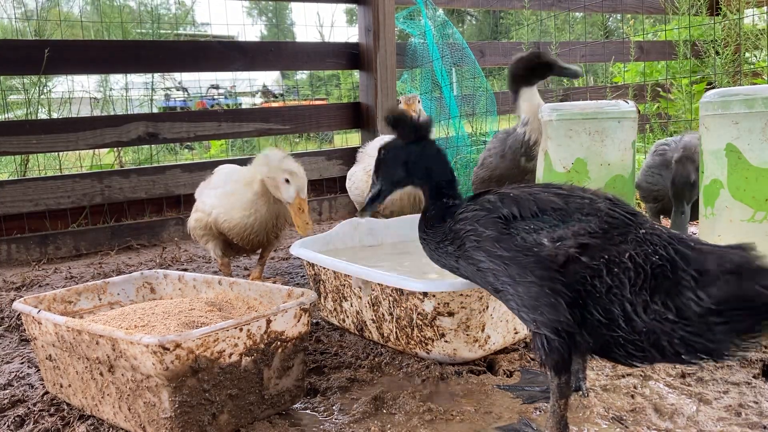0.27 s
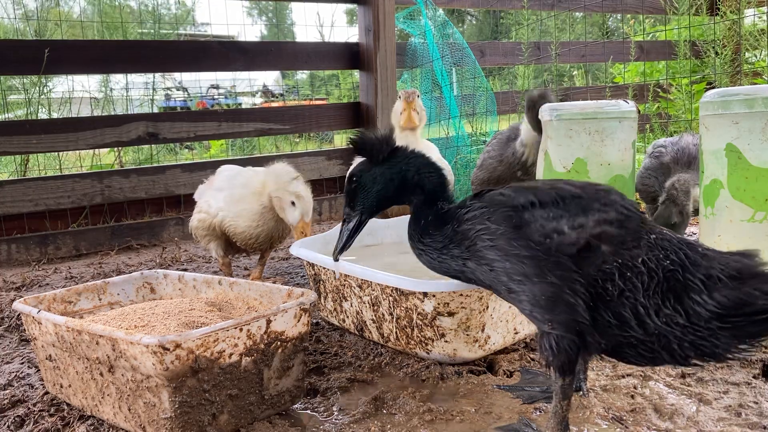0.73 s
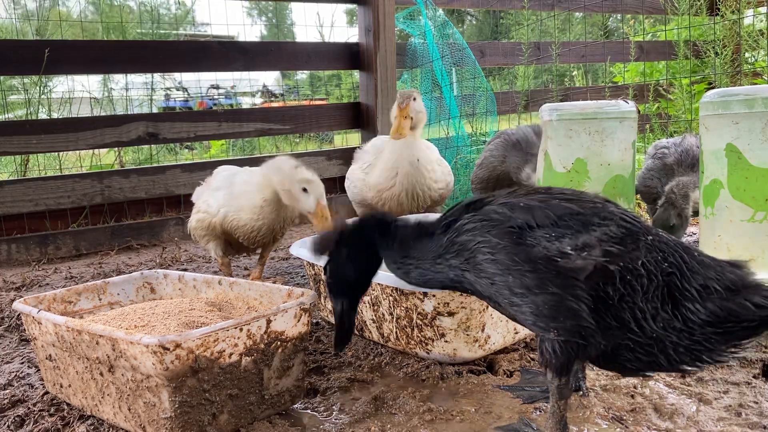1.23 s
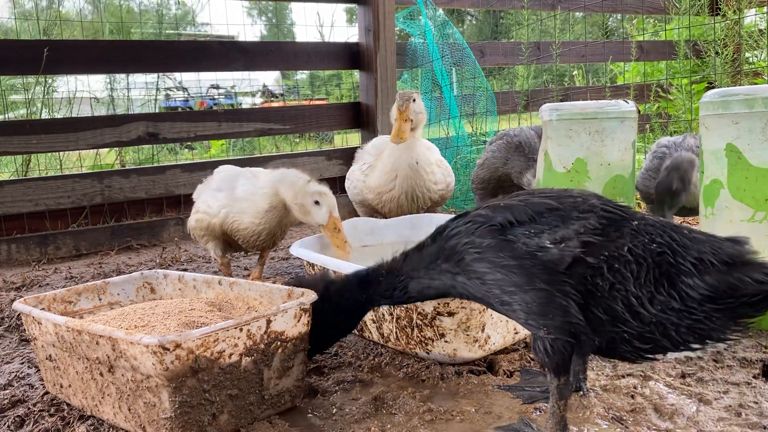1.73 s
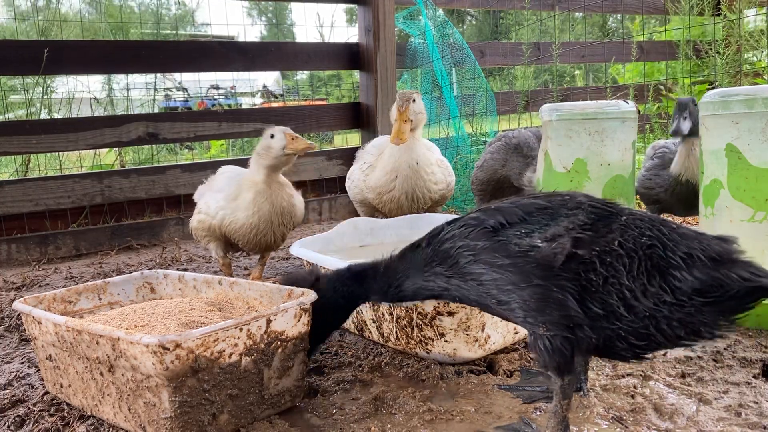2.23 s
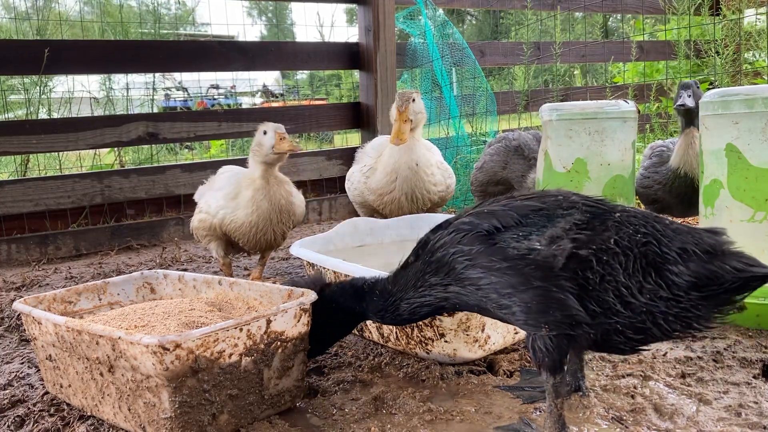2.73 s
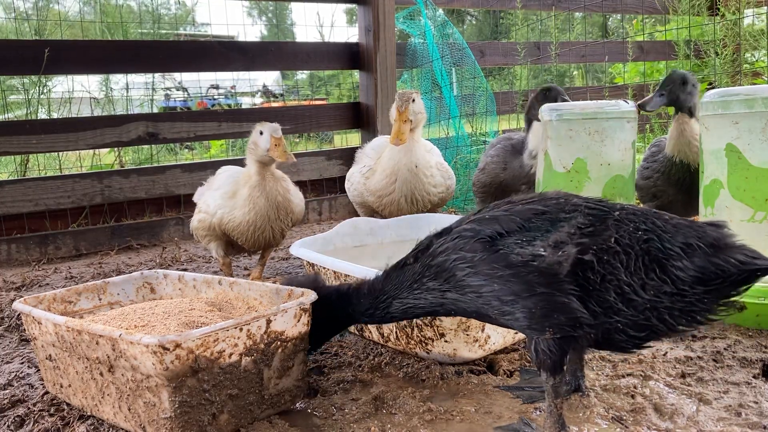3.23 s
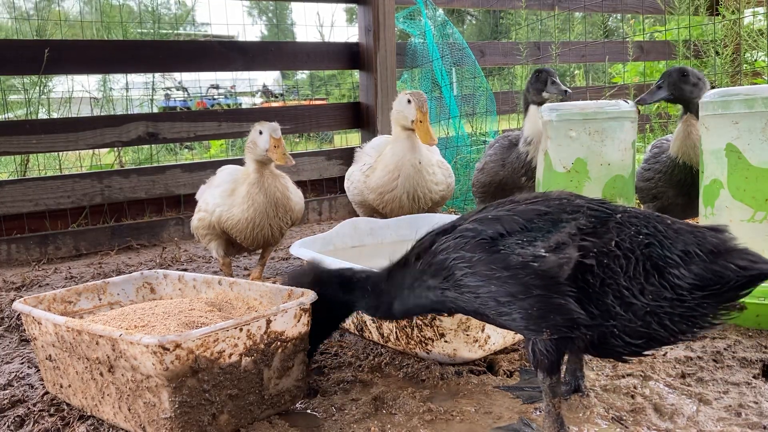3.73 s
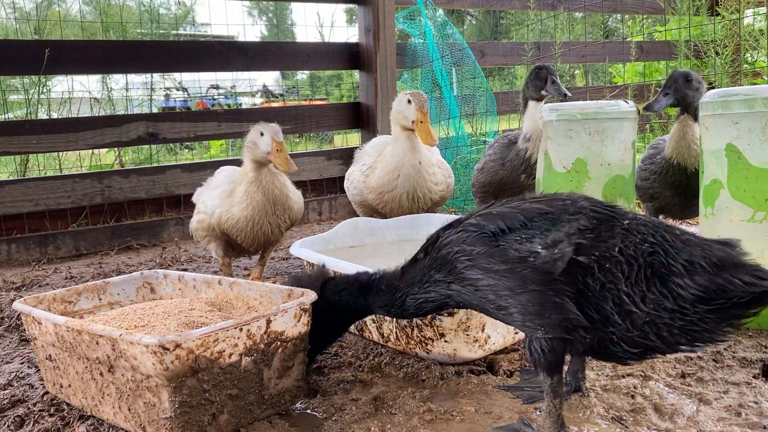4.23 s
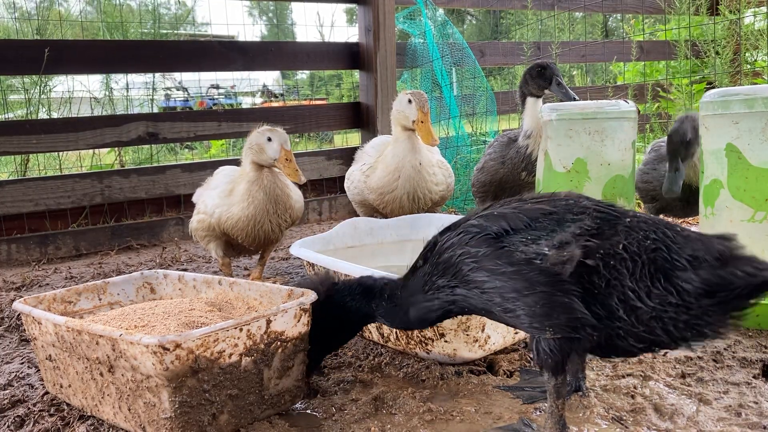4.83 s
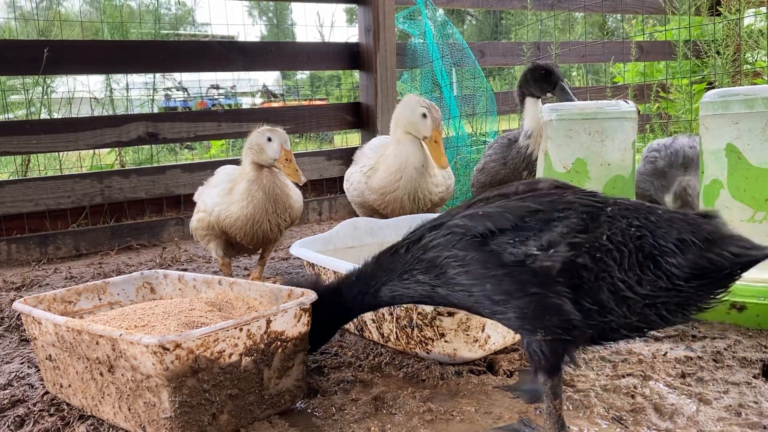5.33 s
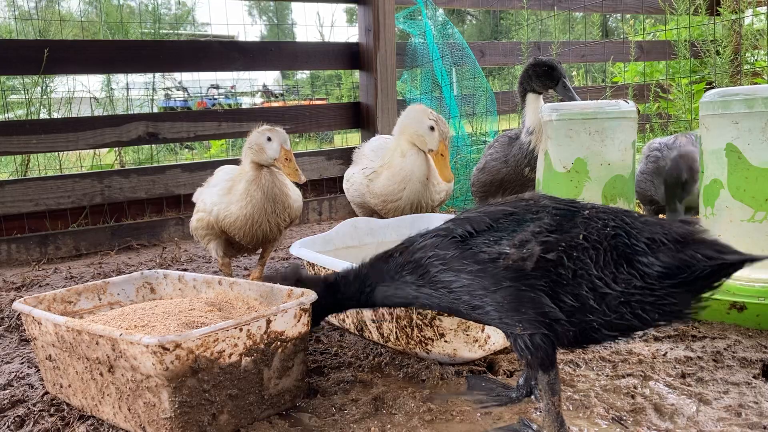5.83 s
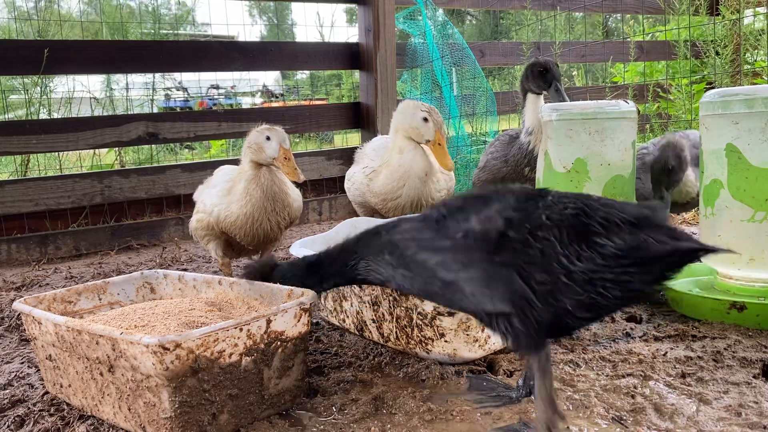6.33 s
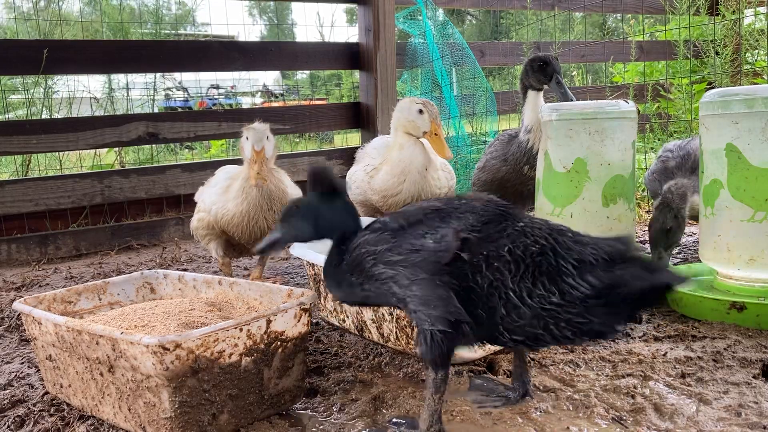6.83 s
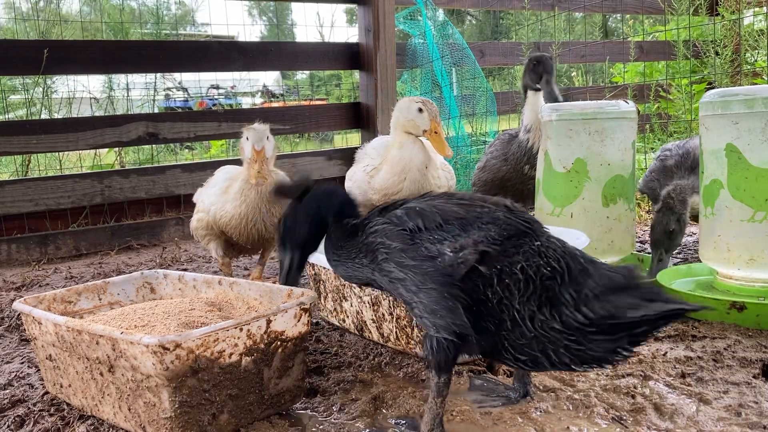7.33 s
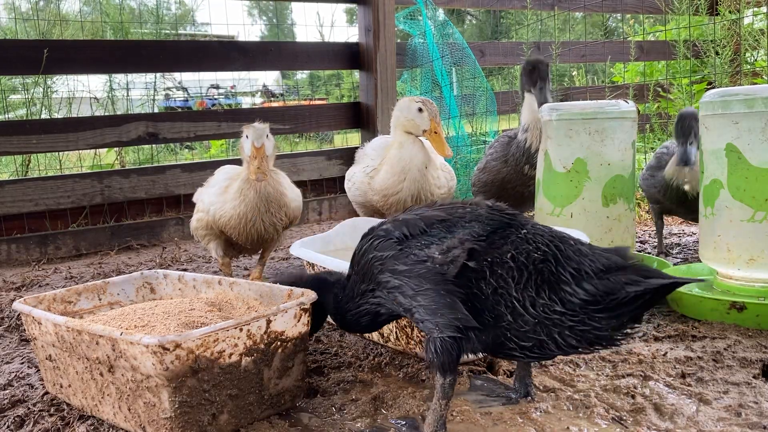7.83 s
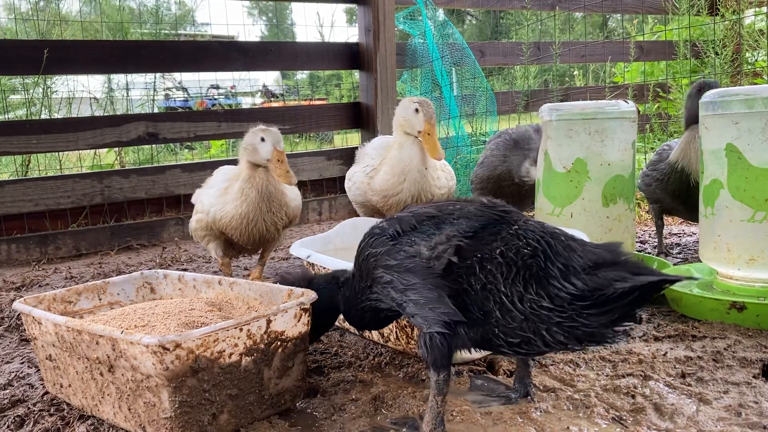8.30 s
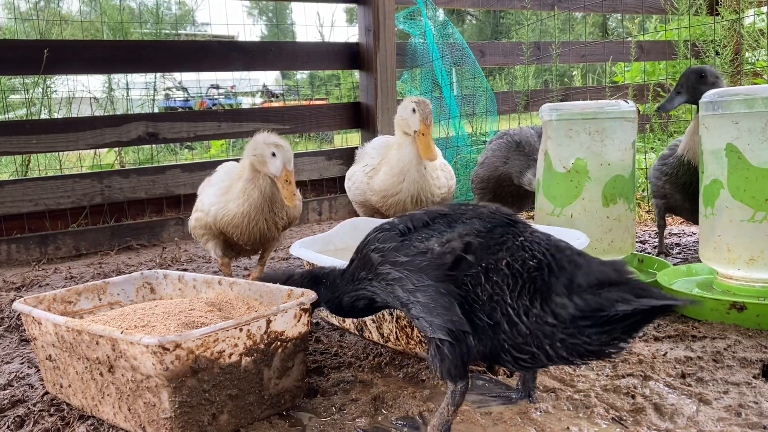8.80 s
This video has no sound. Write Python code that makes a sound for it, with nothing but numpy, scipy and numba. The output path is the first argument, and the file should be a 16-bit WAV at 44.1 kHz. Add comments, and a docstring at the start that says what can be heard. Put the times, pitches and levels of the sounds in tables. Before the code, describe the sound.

Close wet bill clicking and nibbling at a feed tub, drips and dull thuds, a brief quack midway, faint motor hum and insect buzz outdoors.

```python
"""Ducks in an outdoor pen, close to a phone on the ground. Bills clack and dabble in wet feed: noise bursts
ring through resonances. Damped tones make the knocks on tubs and the drips, bursts of droplets the splashes.
One short quack is a stack of harmonics, and a few peeps are nearly pure tones. Behind them two motors and the
mains hum and beat against each other (steady sines), an insect buzzes high up (pulsed noise) and the breeze
rustles in a background hiss (soft noise)."""
import sys
import numpy as np
from scipy import signal
from scipy.fft import rfft, irfft
from scipy.io import wavfile
from scipy.ndimage import uniform_filter1d
from numba import njit

SR = 44100
rng = np.random.default_rng(int(sys.argv[2]) if len(sys.argv) > 2 else 0)


def transcribe(signal):
    """Save signal, clipped to [-1, 1], as a 16-bit WAV file at the path in sys.argv[1]."""
    frames = np.atleast_2d(signal).T
    limited = np.clip(frames, -1, 1)
    pcm = np.round(limited * 32767).astype(np.int16)
    wavfile.write(sys.argv[1], SR, pcm)


N = 399546
T = np.arange(N) / SR  # time of each sample, s
HZ = np.arange(N // 2 + 1) * SR / N  # pitch of each spectrum bin


def undb(db):
    """Turn dB into a gain."""
    return 10 ** (np.asarray(db) / 20)


def unit(x):
    """Scale to an rms of 1."""
    return x / np.sqrt(np.mean(x ** 2))


def band(x, hz, width_hz):
    """Resonance with gain 1 at its centre."""
    width_hz = min(width_hz, SR / 5)
    return signal.lfilter(*signal.iirpeak(hz, hz / width_hz, SR), x)


@njit
def svf(x, hz, damp):
    """Resonance whose centre can move with time; gives its band-pass and high-pass outputs."""
    mid, high, b, l = np.empty(len(x)), np.empty(len(x)), 0., 0.
    for i in range(len(x)):
        g = np.tan(np.pi * hz[i] / SR)
        v = (b + g * (x[i] - l)) / (1 + g * (g + damp))
        mid[i] = damp * v
        high[i] = x[i] - damp * v - l - g * v
        b, l = 2 * v - b, l + 2 * g * v
    return mid, high


def add(track, s, x):
    """Mix a short sound into the track at s seconds."""
    i = int(s * SR)
    track[i:i + len(x)] += x[:N - i]


def fade(t60_s, rise_s):
    """Quick rise, then an exponential fall that loses 60 dB in t60_s."""
    t = np.arange(int(t60_s * SR) + 8) / SR
    return (1 - np.exp(-t / rise_s)) * 1000 ** (-t / t60_s)


def walk(rate):
    """Slow random wandering: about rate new levels a second, smoothed twice; spread near 1."""
    hold = int(SR / rate)
    steps = np.repeat(rng.standard_normal(N // hold + 1), hold)
    smooth = uniform_filter1d(uniform_filter1d(steps, hold), hold)
    return 1.25 * smooth[:N]


# change in the level of the low hum with time: start_s, change_db
HUM_CHANGE = [(0, 2), (2, 2), (4, -1.5), (7, -1.5), (8, -0.6), (9.06, -0.5)]


def hum_change():
    """The level of the low hum sinks, then recovers a little."""
    s, db = np.transpose(HUM_CHANGE)
    return np.interp(T, s, db)


# base rate of each hum, two motors and then the mains: rate_hz
HUM_RATES = [59.02, 55.0, 60.0]
# one row a hum, before the hum change: level_db (rms) of 1, 2, 3, 4 and 5 times its base rate
HUM_LEVELS = [(-41.5, -55, -57, -51, -66), (-47, -66, -54, -64, -75), (-70, -56, -70, -59.5, -75)]


def hums(hum_db):
    """Steady multiples of each base rate; the higher ones waver more, and near rates beat."""
    out = 0
    for hz, levels_db in zip(HUM_RATES, HUM_LEVELS):
        for k, db in enumerate(levels_db, 1):
            gain = np.sqrt(2) * undb(db + 0.52 * k * walk(3.27))
            out = out + gain * np.sin(2 * np.pi * (k * hz * T + rng.random()))
    return out * undb(hum_db)


# colour of the background hiss before its swells: pitch_hz, level_db (for each Hz of width)
HISS_COLOUR = [(28, -79), (45, -60), (60, -62.5), (110, -65), (250, -70), (500, -81.5), (1000, -88),
               (2000, -95.5), (4000, -100), (5500, -103), (7000, -102), (9000, -108), (11500, -104),
               (13500, -114), (15000, -108), (16000, -112)]


def breeze(gust_db, rumble_db):
    """Background hiss in overlapping octave parts that swell with the gust and flicker on their own."""
    hz, db = np.transpose(HISS_COLOUR)
    colour_db = np.interp(np.log(HZ + 1), np.log(hz), db, left=-120)
    colour = rfft(rng.standard_normal(N)) * undb(colour_db) * np.sqrt(SR / 2)
    octave = np.log2((HZ + 1) / 30)
    out = np.zeros(N)
    for k in range(11):
        part = irfft(colour * np.clip(1 - abs(octave - k), 0, 1), N)
        swell_db = gust_db + 1.6 * walk(7)
        if k < 5:  # only the low parts follow the rumble
            swell_db = swell_db + rumble_db
        out += part * undb(swell_db)
    return out


# the insect through time: start_s, level_db (rms), pitch_hz (middle of each stroke's climb)
INSECT_PATH = [(0, -57.5, 9620), (4.77, -57.5, 9620), (4.81, -66, 9450), (6.5, -66, 9450), (6.6, -60, 9480),
               (7.8, -59.5, 9520), (8.3, -58.5, 9620), (9.06, -58, 9620)]
STROKE_RATE_HZ = 64.2


def insect():
    """Wing strokes pulse a narrow high rasp that climbs during each stroke, with a fainter skirt below."""
    s, db, hz = np.transpose(INSECT_PATH)
    stroke = (STROKE_RATE_HZ * T + 0.13 * walk(6.3)) % 1  # 0-1 through each stroke
    hz = np.interp(T, s, hz) * (1 + 0.049 * (stroke - .5))
    noise = rng.standard_normal(N)
    rasp = svf(svf(noise, hz, 0.045)[0], hz, 0.07)[0]
    skirt = undb(-12) * band(band(noise, 9190, 1200), 9380, 1800)
    pulse = .35 + np.sin(np.pi * stroke)
    return unit((rasp + skirt) * pulse) * undb(np.interp(T, s, db))


KNOCK_CYCLES = 15  # a knock loses 60 dB in this many cycles, within these limits:
KNOCK_SHORTEST_S, KNOCK_LONGEST_S = .013, .067
SHORTEST_RISE_S, UPPER_MODE_DB = .0008, -15
DRIP_HZ = 3000  # from here up the glide scale and raggedness are full
DRIP_GLIDE = .25  # largest glide scale; the pitch climbs by up to twice this share
DRIP_ROUGH = .8  # share of noise, 0-1
# dull knocks on tubs and ground, plops and drips in the water: start_s, level_db (about the peak),
# pitch_hz (before any glide)
KNOCKS_AND_DRIPS = [(.052, -50, 5000), (.093, -38.5, 560), (.161, -45, 8000), (.171, -46, 4500),
                    (.219, -49, 2000), (.779, -46, 2600), (.968, -41.5, 794), (.993, -42, 5260),
                    (1.13, -44.5, 2760), (1.176, -50, 1500), (1.219, -47, 5000), (1.124, -42.5, 890),
                    (1.209, -38, 447), (1.288, -38.5, 490), (1.317, -49, 820), (1.381, -50, 4200),
                    (1.387, -47, 810), (1.436, -47, 7750), (1.481, -45, 850), (1.561, -48, 840),
                    (1.61, -41, 430), (1.764, -45, 1900), (1.766, -45, 3300), (1.959, -44, 6700),
                    (2.003, -37.5, 1820), (2.259, -43, 4270), (2.447, -41, 1850), (1.962, -28, 217),
                    (1.995, -29, 212), (2.064, -40, 169), (2.176, -30.5, 206), (2.25, -35, 200),
                    (2.37, -36.5, 184), (2.105, -45, 800), (2.213, -46, 1500), (2.643, -26, 92),
                    (2.705, -22, 116), (2.909, -40.5, 620), (3.146, -33, 403), (3.211, -44.5, 1780),
                    (3.233, -42, 1110), (3.272, -49, 1750), (3.274, -45, 950), (3.301, -47, 2380),
                    (3.31, -45, 800), (3.439, -48, 3020), (3.514, -28, 89), (3.543, -47, 3600),
                    (3.711, -41, 407), (4.278, -48, 1760), (4.586, -45, 3800), (4.932, -42.5, 4040),
                    (4.968, -52, 3000), (5.024, -47, 2020), (5.032, -41, 2650), (5.178, -49, 2500),
                    (5.285, -47, 7500), (5.384, -44, 2380), (5.526, -45, 2180), (5.6, -45, 1500),
                    (5.601, -47, 3520), (6.118, -48, 5100), (6.12, -53, 3100), (6.324, -38.5, 281),
                    (6.329, -39.5, 596), (6.459, -35.5, 173), (7.146, -45.5, 1750), (7.23, -44, 1050),
                    (7.252, -40.5, 422), (7.254, -42.5, 2880), (7.336, -47, 3540), (7.447, -22.5, 522),
                    (8.204, -42.5, 432), (8.204, -37.5, 790), (8.207, -42, 1020), (8.222, -52, 945),
                    (8.299, -39, 430), (8.3, -43, 1030), (8.41, -43, 516), (8.475, -39.5, 500),
                    (8.477, -48, 1440), (8.536, -47, 3920), (8.857, -44, 4000), (8.95, -36.5, 4930),
                    (9.021, -44, 5360)]


def knocks():
    """Damped tones with a quicker mode above; high drips glide up raggedly; faint plops lie between."""
    out = np.zeros(N)
    faint = []
    for when, size, pitch in rng.random((90, 3)):
        faint.append((when * N / SR, -54 + 8 * size, 300 * 3 ** pitch))
    for s, db, hz in KNOCKS_AND_DRIPS + faint:
        t60_s = np.clip(KNOCK_CYCLES / hz, KNOCK_SHORTEST_S, KNOCK_LONGEST_S)
        shape = fade(t60_s, max(1.07 / hz, SHORTEST_RISE_S))  # bigger bodies are pushed more slowly
        shape = shape / shape.max()
        small = min(hz / DRIP_HZ, 1)
        along = np.arange(len(shape)) / len(shape)
        glide = DRIP_GLIDE * small * rng.random() * (2 * along - .3)
        phase = 2 * np.pi * np.cumsum(hz * (1 + glide)) / SR
        rough = DRIP_ROUGH * small
        fizz = unit(band(rng.standard_normal(len(shape)), hz, .5 * hz))
        tone = np.sqrt(1 - rough ** 2) * np.sin(phase) + rough * fizz / 2
        upper = undb(UPPER_MODE_DB) * shape ** 3.2 * np.sin(2.05 * phase)
        add(out, s, undb(db) * (shape * tone + upper))
    return out


LEAD_S = .01  # room before the blow for the first touch
RING_WIDTH = .27  # as a share of the ring's pitch
WET_DB = -17.5  # strength of the wet smear's noise against the blow's


def clack(db, ring_hz, bright_db, tick_hz):
    """A bill shuts raggedly: first touch, blow, rebound, smear; its hollow rings and the wet film ticks."""
    burst, shape = np.zeros(2048), fade(.008, .0006)
    first_s, rebound_s, first, rebound = rng.random(4)
    add(burst, LEAD_S - .002 - 0.0053 * first_s, undb(-15 - 10 * first) * shape)
    add(burst, LEAD_S, shape)
    add(burst, LEAD_S + 0.0043 + 0.0143 * rebound_s, undb(-15 - 12 * rebound) * shape)
    add(burst, LEAD_S, undb(WET_DB) * fade(.05, .004)[:1600])
    ring_noise, tick_noise = burst * rng.standard_normal((2, 2048))

    ring = band(band(ring_noise, ring_hz, RING_WIDTH * ring_hz), ring_hz, 0.7 * ring_hz)
    ring += undb(-19) * band(band(ring_noise, 1690, 540), 2100, 1500)
    ring += undb(-26) * band(ring_noise, 2500, 4300)
    tick = band(band(tick_noise, tick_hz, 1700), tick_hz, 8000)
    tick += undb(-3.5) * band(np.diff(tick_noise, prepend=0), 9240, 2500)

    bright = min(undb(bright_db), .98)
    dull = np.sqrt(1 - bright ** 2)
    return undb(db) * (dull * ring / abs(ring).max() + bright * tick / abs(tick).max())


# bill clacks: start_s (the blow), level_db (about the peak), ring_hz, bright_db (share of wet tick), tick_hz
BILL_CLACKS = [(0.081, -40, 5690, -2.5, 10150), (0.1095, -40, 1350, -1, 9650),
               (0.199, -31.5, 4600, 0, 11800), (0.2293, -31, 1410, 0, 10300), (0.777, -44, 2000, -16, 9830),
               (0.995, -44, 1870, -18, 9810), (1.037, -43, 1780, -17, 9730),
               (1.129, -43.5, 1790, -23, 9780), (1.175, -39.5, 1520, -1.5, 11000),
               (1.5454, -32.5, 1780, -5, 7500), (1.547, -33.5, 3820, -20, 7500),
               (1.664, -34, 1930, -3.5, 6200), (1.75, -33, 1780, 0, 11000), (1.786, -37, 1950, -2, 9840),
               (1.8354, -31, 4140, -3.5, 7050), (1.881, -34.5, 1810, 1, 10400),
               (1.9433, -32.5, 1630, -11, 10600), (1.996, -31.5, 3700, -7.5, 10000),
               (2.0032, -27.5, 4000, -18, 10100), (2.0643, -38, 1310, 0, 10800),
               (2.082, -33, 3800, -2.5, 10900), (2.1477, -33.5, 4250, -5, 6400),
               (2.2, -30.5, 1600, 0, 7500), (2.26, -37, 1840, -9, 10000), (2.303, -38.5, 2020, -3, 9790),
               (2.325, -31, 4420, -6.5, 6600), (2.432, -44, 1810, -16, 9840),
               (2.446, -31.5, 3700, -25, 6560), (2.4918, -39, 1440, 0, 10200),
               (2.5058, -27, 3900, -2, 8660), (2.743, -31, 2240, -2, 9600), (2.7432, -39, 1590, -20, 9600),
               (3.1162, -35, 1440, 0, 10700), (3.21, -37, 1210, -25, 7540), (3.355, -38.5, 1460, 0, 6740),
               (3.3788, -36.5, 3930, -12, 6420), (3.4134, -38, 1410, 0, 7040),
               (3.4455, -34, 3960, -2.5, 7160), (3.4679, -39, 1770, 0, 7020), (3.524, -37, 1770, 0, 9800),
               (3.576, -39, 2390, 0, 10100), (3.592, -32, 3600, 0, 11000), (3.644, -37, 4000, -2, 11100),
               (3.6592, -18, 4100, -1, 7330), (3.6598, -23.5, 2390, -5.5, 6900),
               (3.782, -34.5, 4200, -14, 10500), (3.8416, -34, 1310, 0, 10400),
               (3.875, -34.5, 6470, -15, 6500), (3.987, -30, 1410, 0, 10200), (4.0496, -40, 1630, 0, 10100),
               (4.24, -39, 5690, -4, 6350), (4.31, -36.5, 1780, -0.5, 11500),
               (4.3112, -35.5, 3330, -1, 6700), (4.3498, -33.5, 4640, -3.5, 11200),
               (4.41, -37, 1770, 0, 10500), (4.529, -37, 3920, -5, 10400), (4.5851, -36, 1780, 0, 9450),
               (4.9037, -38.5, 1580, 1, 11200), (5.003, -34.5, 2340, -2.5, 7500),
               (5.0222, -39, 2960, -2, 7640), (5.1645, -42, 2560, -20, 9700), (5.2035, -35, 2330, 0, 10200),
               (5.2593, -40, 1790, 0, 12000), (5.4203, -29.5, 4140, 0, 11400),
               (5.505, -39.5, 2050, -21, 10300), (5.5832, -39.5, 2140, -3.5, 8230),
               (5.657, -39, 1590, 0, 10100), (5.679, -39.5, 2500, -3, 7600),
               (5.8144, -38.5, 1530, 0, 12200), (5.8316, -38, 2800, -21, 7770),
               (5.936, -42, 1350, 0, 10400), (6.1874, -35, 2600, -8, 11200),
               (6.1873, -33.5, 3250, -20, 11200), (6.188, -39, 4550, -20, 9000),
               (6.305, -38, 1920, 1, 11600), (6.4678, -36, 1900, -1, 10100),
               (6.523, -24.5, 5360, -4, 10300), (6.9007, -38.5, 4130, -9, 6440),
               (7.034, -40.5, 1940, -1.5, 6730), (7.177, -40, 1510, -23, 7810),
               (7.226, -44, 1700, -14, 9530), (7.251, -38, 1640, -26, 9810), (7.3798, -39, 1480, 0, 10100),
               (7.414, -38.5, 1660, -1, 11100), (7.4452, -31.5, 2230, -30, 9580),
               (8.0418, -38.5, 1700, 0, 10900), (8.204, -46, 1890, -25, 9700), (8.409, -43, 1520, -2, 9820),
               (8.4482, -35.5, 1540, 0, 8040), (8.4748, -46, 1440, -16, 9830),
               (8.7672, -41, 1920, -20, 9480), (8.8412, -35, 8200, -7, 10500),
               (8.9205, -35.5, 4380, -8, 7950), (8.9464, -32.5, 2700, -8, 10200),
               (8.9685, -30.5, 2580, 0, 10400), (9.032, -32.5, 2570, -5, 11500)]


def bill():
    """Clacks of the bill in wet feed, with many fainter nibbles strewn around them."""
    out = np.zeros(N)
    for s, *sound in BILL_CLACKS:
        add(out, s - LEAD_S, clack(*sound))
    for which, when, size, pitch, wet in rng.random((550, 5)):
        s = BILL_CLACKS[int(which * len(BILL_CLACKS))][0] + .24 * (when - .5)
        level_db = -54 - 2.2 * np.log(1 - .93 * size)  # most are faint, few are strong
        bright_db = min(12 - 50 * wet, 0)
        nibble = clack(level_db, 900 * 6 ** pitch, bright_db, 6500 + 6000 * pitch)
        add(out, np.clip(s, 0, N / SR - .05), nibble)
    return out


SPLASH_WIDTH = 2.1  # as a share of the centre pitch
SQUIRT_S = 0.21  # splashes shorter than this are narrower
# splashes: start_s, level_db (rms before the fade), centre_hz, t60_s (time to lose 60 dB)
WATER_SPLASHES = [(.195, -54, 6000, .16), (.97, -59, 1770, 0.5), (.925, -63, 3300, 0.08),
                  (1.3, -51.5, 1300, 0.11), (1.37, -55.5, 4000, .12), (1.487, -50, 3500, 0.18),
                  (1.548, -46.5, 3730, 0.11), (1.596, -48.5, 2400, 0.11), (1.661, -54, 4000, 1.15),
                  (1.929, -58.5, 2800, 1.4), (3.212, -49, 1470, 0.53), (3.664, -50, 2200, 0.089),
                  (4.988, -62, 2400, 0.73), (5.419, -42, 6700, 0.13), (5.682, -47.5, 1640, 0.4),
                  (5.682, -47, 6000, 0.17), (6.191, -44, 4040, 0.044), (6.304, -43, 1740, 0.24),
                  (6.302, -41, 10600, 0.11), (6.341, -54, 10800, 0.77), (7.152, -53.5, 1600, 0.34),
                  (7.702, -47, 1260, 0.58), (7.706, -46.5, 3500, 0.18), (8.204, -40.5, 920, 0.052),
                  (8.299, -48, 3150, 0.065), (8.41, -49.5, 1300, 0.09), (8.476, -53, 1100, .07),
                  (8.893, -50, 3500, 0.091), (8.919, -53, 4000, 0.33), (9.015, -49, 3500, .15)]


def splashes():
    """Dense droplets of uneven size through a broad resonance, dying away."""
    out = np.zeros(N)
    for s, db, hz, t60_s in WATER_SPLASHES:
        shape = fade(t60_s, 0.002)
        size_db = 3.1 * np.minimum(rng.exponential(size=len(shape)), 3)
        size_db = np.repeat(size_db, 60)[:len(shape)]  # each size lasts 60 samples
        drops = rng.standard_normal(len(shape)) * undb(size_db)
        width_hz = SPLASH_WIDTH * hz * min(t60_s / SQUIRT_S, 1)
        water = band(band(drops, hz, width_hz), hz, width_hz)
        add(out, s, undb(db) * shape * unit(water))
    return out


def voice(table):
    """Start, pitch, phase and gain of one call, closed softly at both ends."""
    s, hz, db = np.transpose(table)
    t = np.arange(s[0], s[-1], 1 / SR)
    edge = np.clip(np.minimum(t - s[0], s[-1] - t) / 0.0013, 0, 1)
    pitch = np.interp(t, s, hz)
    phase = 2 * np.pi * np.cumsum(pitch) / SR
    return s[0], pitch, phase, edge * undb(np.interp(t, s, db))


# peeps, one list of points each: start_s, pitch_hz, level_db (peak of the main tone)
PEEP_PATHS = [
    [(1.425, 1560, -50), (1.44, 1890, -56), (1.46, 2090, -48), (1.472, 2080, -49), (1.494, 1760, -36.5),
     (1.505, 1744, -44), (1.514, 1630, -34), (1.527, 1580, -38), (1.534, 1470, -47), (1.542, 1400, -54)],
    [(6.325, 1330, -38), (6.333, 1450, -43), (6.34, 1690, -42), (6.353, 1690, -44), (6.362, 1670, -39),
     (6.386, 1650, -29), (6.402, 1694, -29), (6.416, 1655, -29), (6.427, 1495, -35.5), (6.434, 1410, -44)],
    [(6.389, 1940, -56), (6.398, 1965, -42), (6.408, 1950, -57)],
    [(6.306, 1940, -52), (6.316, 1970, -50), (6.34, 1940, -53), (6.368, 1930, -58)],
]
# one for each peep: level_db of the second harmonic under the first, at the highest pitch
PEEP_SECOND = [-40, -23, -45, -45]


def peeps():
    """Nearly pure tones; the second harmonic fades as the pitch drops."""
    out = np.zeros(N)
    for table, second_db in zip(PEEP_PATHS, PEEP_SECOND):
        s, pitch, phase, gain = voice(table)
        second = undb(second_db) * (pitch / pitch.max()) ** 16 * np.sin(2 * phase)
        add(out, s, gain * (np.sin(phase) + second))
    return out


# points along the quack: start_s, pitch_hz, level_db (rms of the harmonics)
QUACK_PATH = [(6.012, 312, -46), (6.022, 333, -44), (6.038, 383.6, -37), (6.065, 381, -37),
              (6.088, 361, -37.5), (6.098, 343, -40), (6.107, 327, -37)]
# colour the throat gives to the harmonics: pitch_hz, level_db (relative)
THROAT_COLOUR = [(330, 2), (750, -4.5), (1100, -4.5), (1480, -3), (1800, -20), (2200, -19), (2800, -37),
                 (3350, -25), (4300, -55)]


def quack():
    """Harmonics coloured by the throat, each wavering in level and phase, with some rasp."""
    out = np.zeros(N)
    s, pitch, phase, gain = voice(QUACK_PATH)
    hz, db = np.transpose(THROAT_COLOUR)
    n = len(phase)
    stack = np.zeros(n)
    for k in range(1, 12):
        colour_db = np.interp(np.log(k * pitch), np.log(hz), db)
        waver_db = (1 + 0.35 * k) * walk(88)[:n]
        shaky_phase = k * (phase + .05 * walk(150)[:n]) - k * k
        stack += undb(colour_db + waver_db) * np.cos(shaky_phase)
    # the rasp pulses once in each cycle of the voice
    rasp = (1 + np.cos(phase)) * band(band(rng.standard_normal(n), 2000, 2500), 2200, 3000)
    add(out, s, gain * (unit(stack) + undb(-21) * unit(rasp)))
    return out


def slats(x):
    """The pen's boards scatter a sound back for a moment: a short tail of fading noise."""
    scatter = fade(0.084, 0.002)
    scatter = scatter * rng.standard_normal(len(scatter))
    return undb(-10) * signal.fftconvolve(x, scatter / np.linalg.norm(scatter))[:N]


# the two microphone ports, by pitch: pitch_hz, pan_db (left minus right), lag_radians (left behind right),
# likeness (of the background at the two ports, -1 to 1)
PORT_DIFFERENCES = [(0, -3, -9, 1), (63.5, -1.5, 0.15, 0.47), (106, -1.5, 1.75, 0), (229, 0.5, 0, 0.13),
                    (420, 0, 0.5, 0.68), (736, -0.5, -1, 0), (1624, 5.5, 1.5, 0.098), (2154, 5.5, -2, 0),
                    (4910, 8, 3.5, 0.068), (7340, -6, 6.5, 0.26), (7680, 8.5, 4.5, 1),
                    (8460, 0.5, 8.5, 0.66), (15950, -0.5, 19, 1)]


def ports(near, left, right):
    """Both ports hear the near sound, and a background partly their own; level and lag differ by pitch."""
    hz, *columns = np.transpose(PORT_DIFFERENCES)
    pan_db, lag, like = (np.interp(HZ, hz, column) for column in columns)
    like = np.clip(like, -1, 1)
    near, shared, own = rfft(near), rfft(left), rfft(right)
    left_port = (near + shared) * undb(pan_db / 2) * np.exp(-1j * lag)
    right_back = like * shared + np.sqrt(1 - like ** 2) * own
    right_port = (near + right_back) * undb(-pan_db / 2)
    return irfft(np.array([left_port, right_port]), N)


def scene():
    """Everything as the two ports hear it."""
    hum_db = hum_change()
    gust_db = .9 * walk(2)
    ducks = bill() + splashes() + peeps() + quack()
    near = ducks + knocks() + insect() + hums(hum_db)
    # the low part of the hiss follows the hum's level in part
    left, right = (breeze(gust_db, .7 * hum_db) + slats(ducks) for _ in range(2))
    return ports(near, left, right)


TOP_HZ = 16000  # the phone cuts what lies above
# the phone's bass narrowing: start_s, edge_hz, swing (share of the centre swung out of phase at the edge, 0-1)
BASS_NARROWING = [(0, 840, 0.03), (1.1, 820, 0.08), (2, 350, 0.07), (2.7, 246, 0.68), (3.4, 183, 0.55),
                  (4.2, 28.8, 0.37), (9.06, 39.3, 0.47)]


def record(dry):
    """The phone makes the bass mono below a moving edge, swings the phase there and cuts the top."""
    s, edge_hz, swing = np.transpose(BASS_NARROWING)
    edge = np.exp(np.interp(T, s, np.log(edge_hz)))
    swing = np.clip(np.interp(T, s, swing), 0, 1)
    mid, side = (dry[0] + dry[1]) / 2, (dry[0] - dry[1]) / 2
    swung = swing * svf(mid, edge, 0.78)[0]
    mid, side = mid - swung, side + swung
    for damp in (1.9, 1.6, 1.1, .5):  # four high-passes in a row make a steep cut
        side = svf(side, 0.59 * edge, damp)[1]
    top_cut = signal.ellip(10, .2, 80, TOP_HZ, fs=SR, output="sos")
    return signal.sosfilt(top_cut, [mid + side, mid - side])


dry = scene()
out = record(dry)
transcribe(out)
```